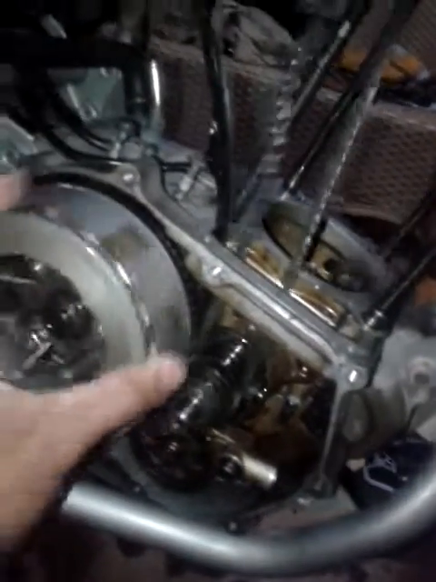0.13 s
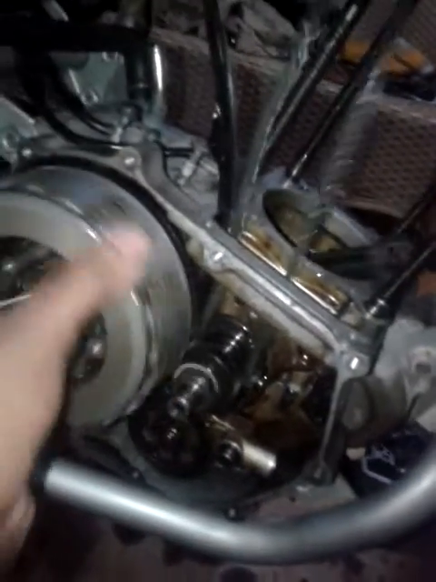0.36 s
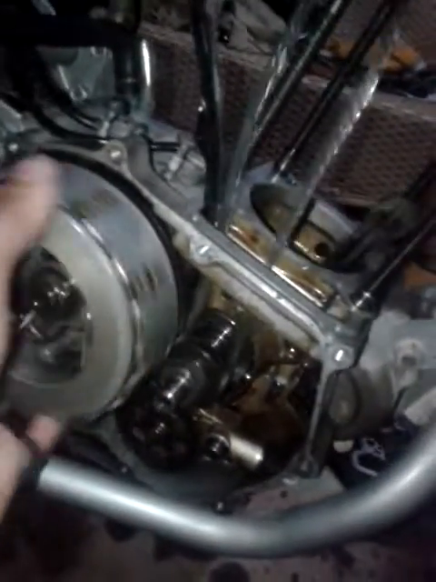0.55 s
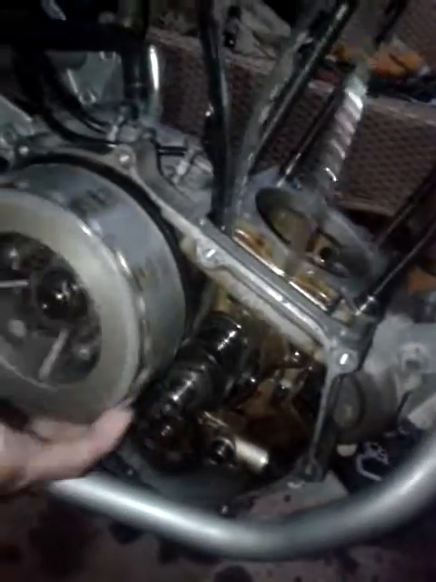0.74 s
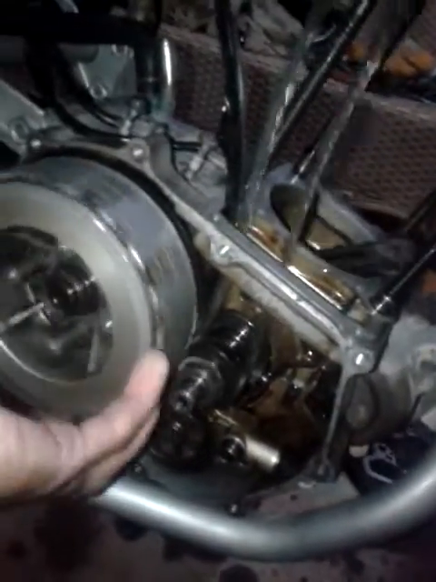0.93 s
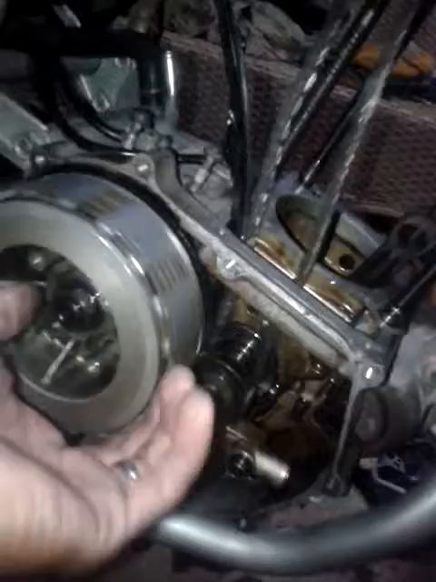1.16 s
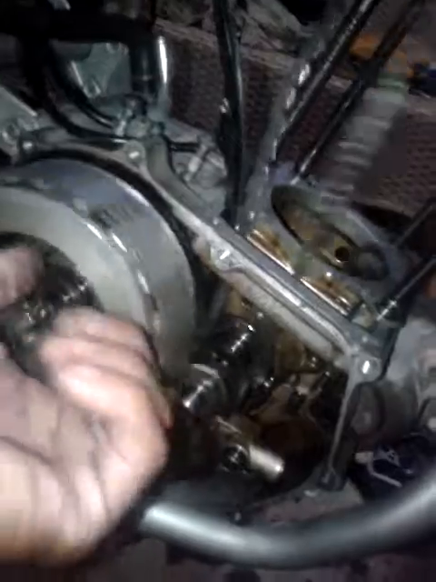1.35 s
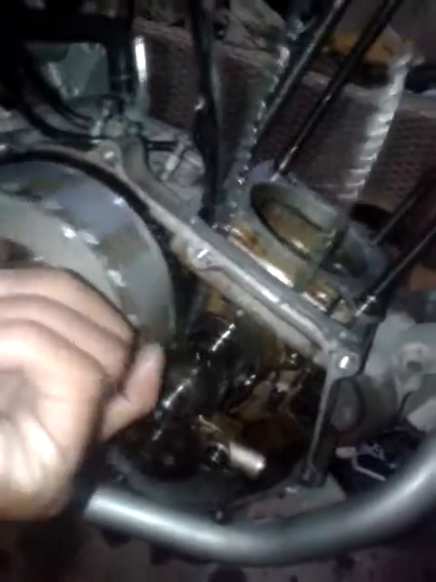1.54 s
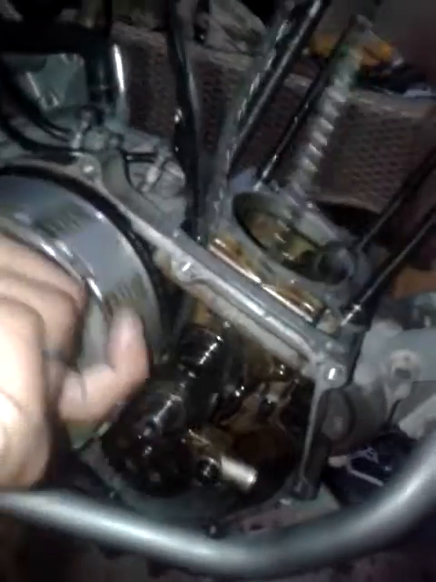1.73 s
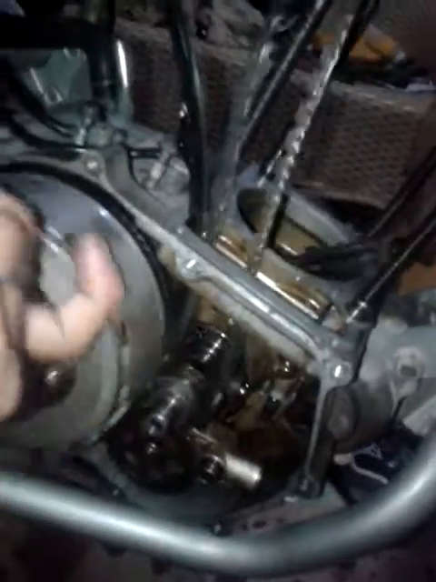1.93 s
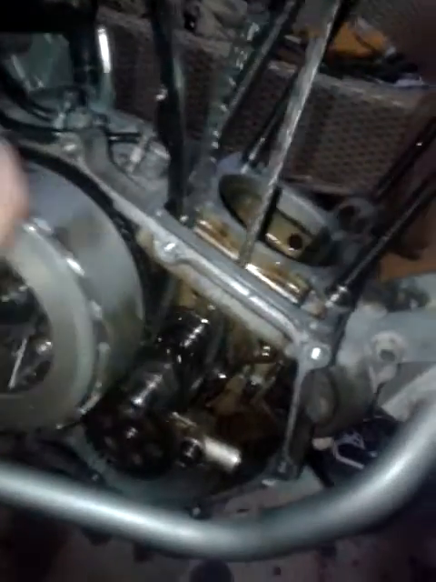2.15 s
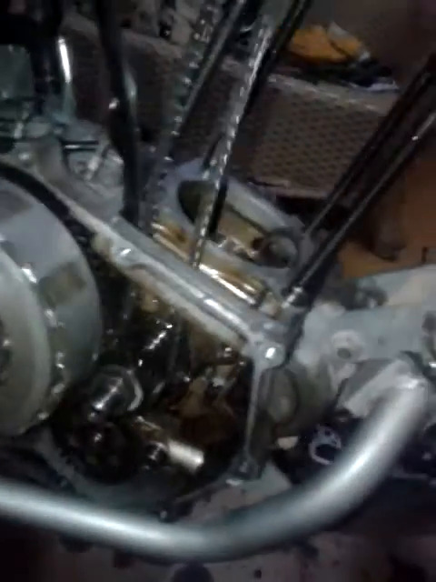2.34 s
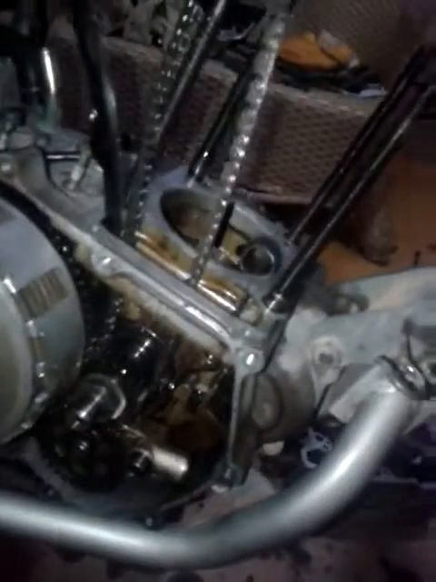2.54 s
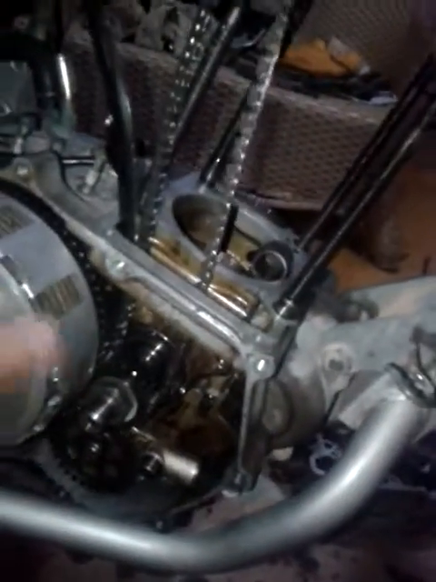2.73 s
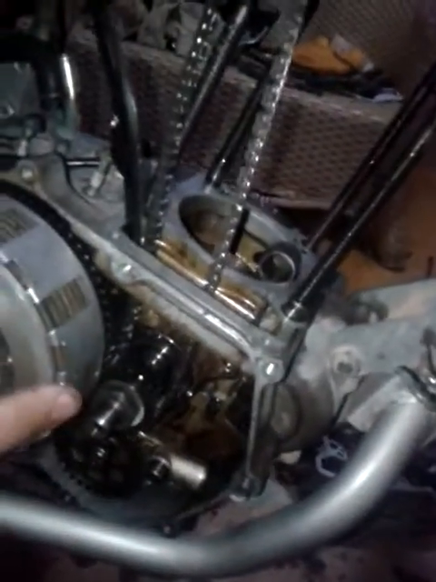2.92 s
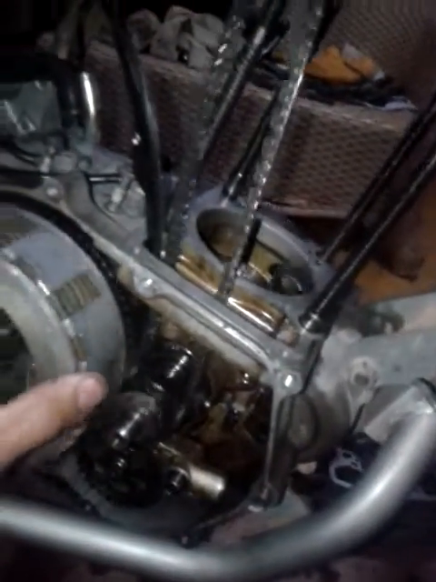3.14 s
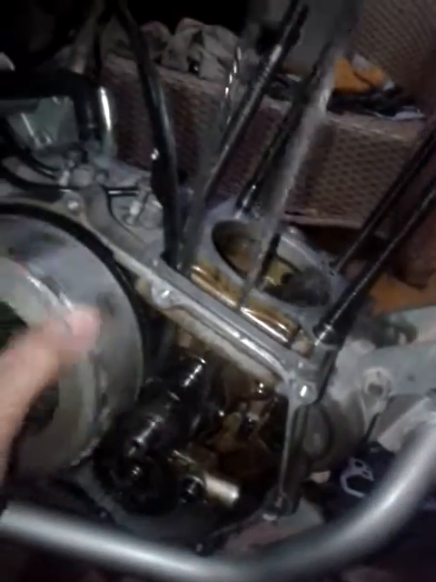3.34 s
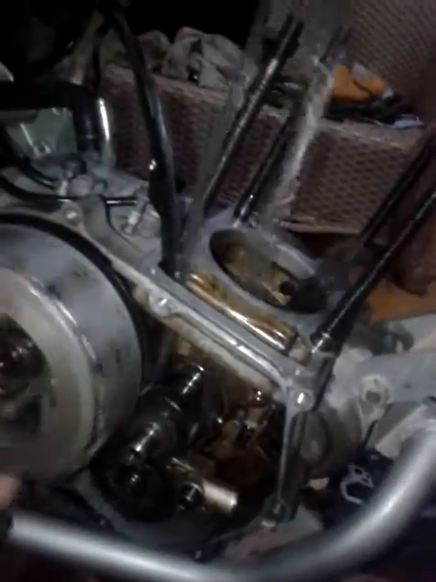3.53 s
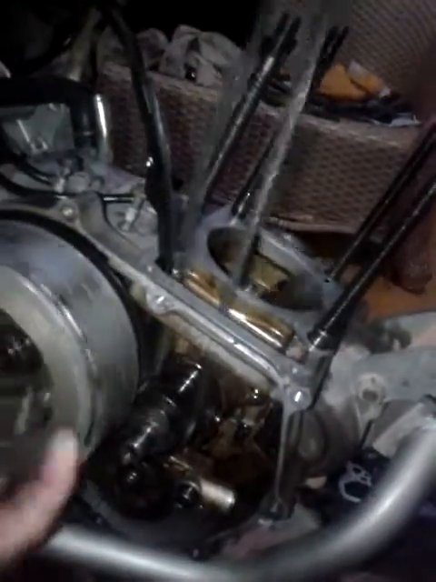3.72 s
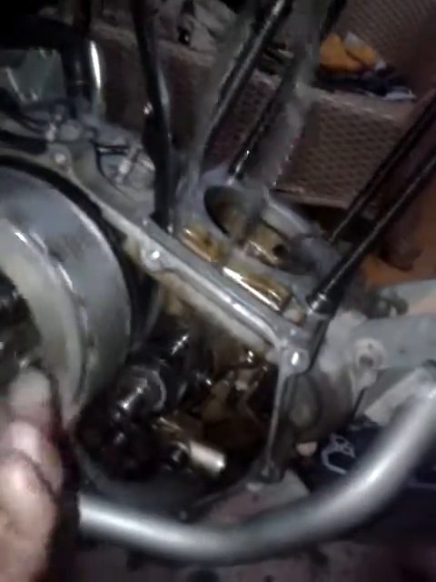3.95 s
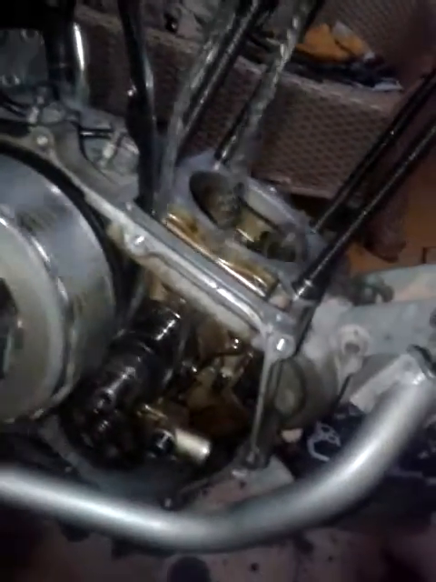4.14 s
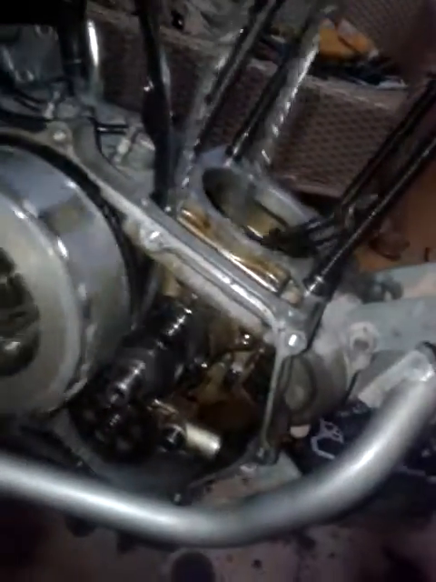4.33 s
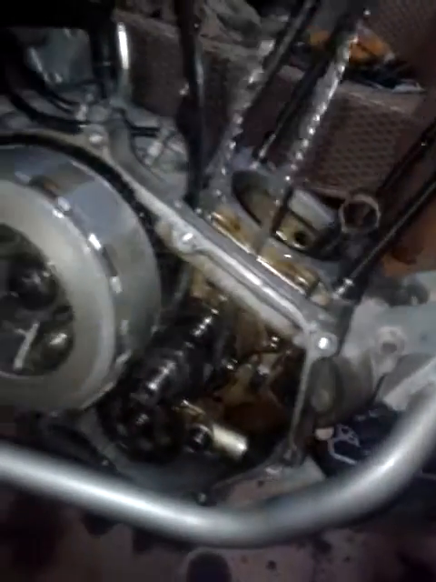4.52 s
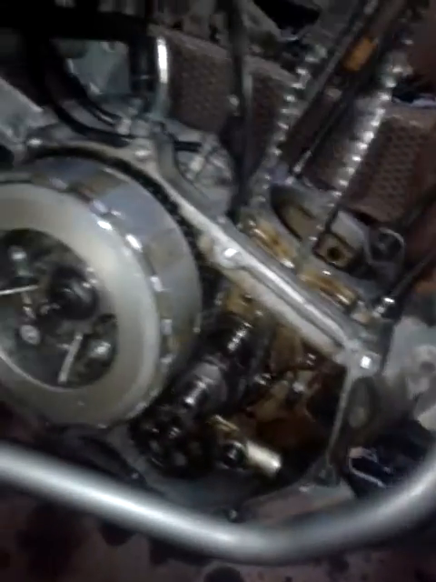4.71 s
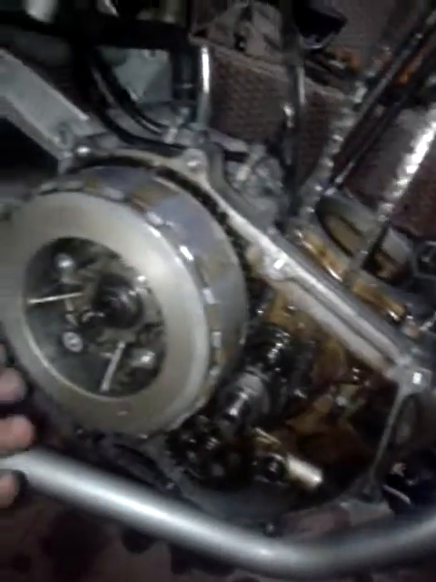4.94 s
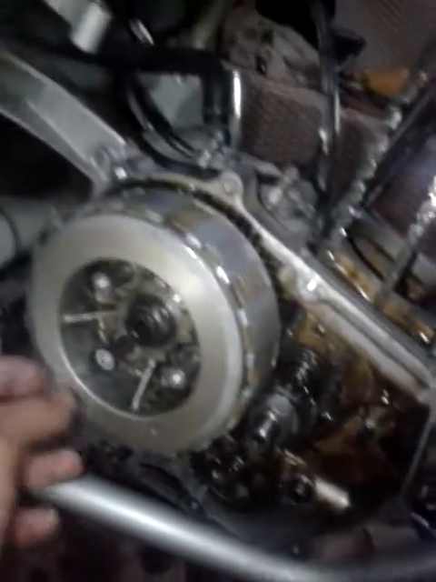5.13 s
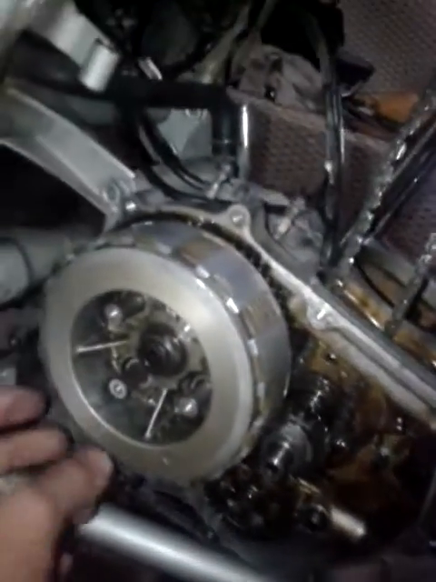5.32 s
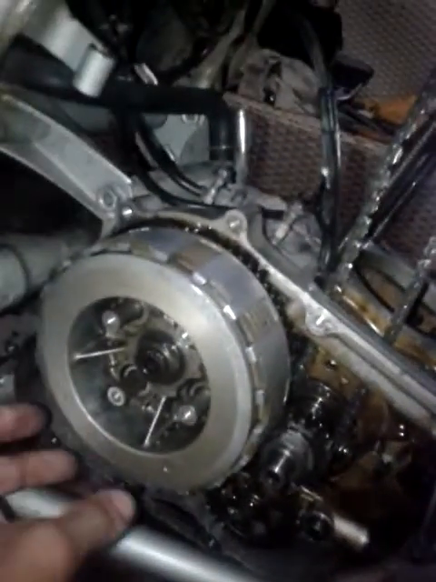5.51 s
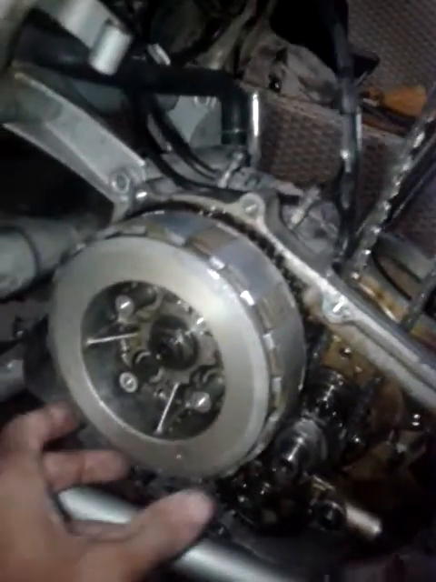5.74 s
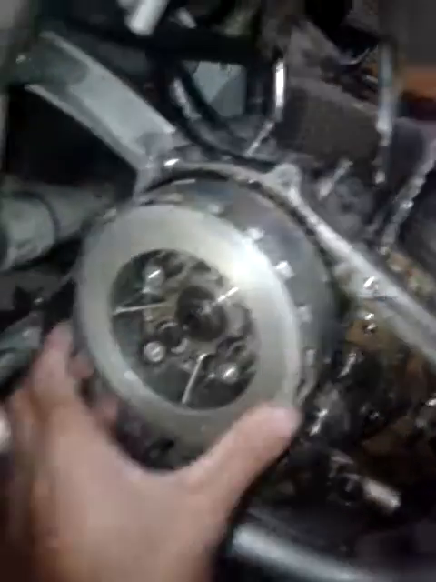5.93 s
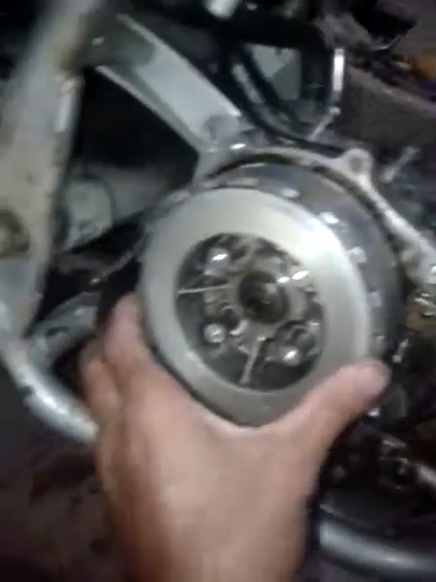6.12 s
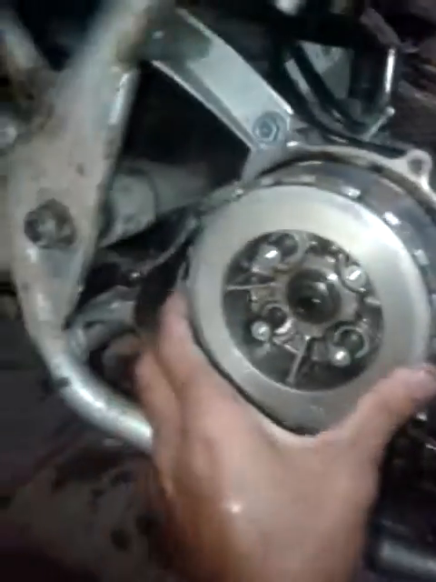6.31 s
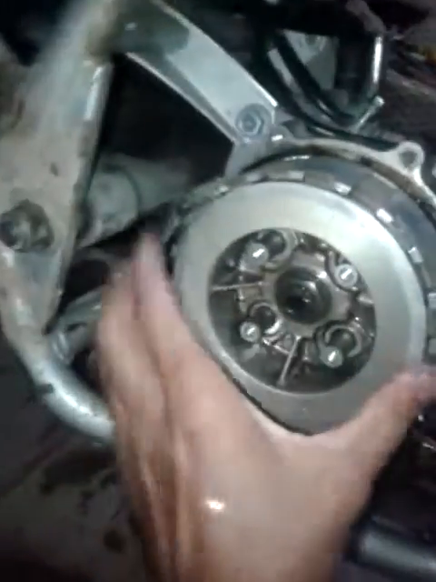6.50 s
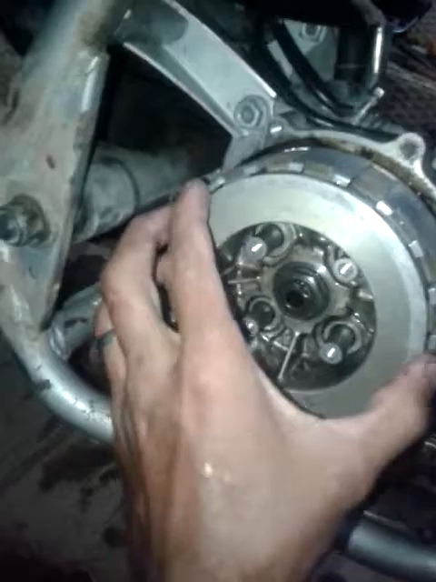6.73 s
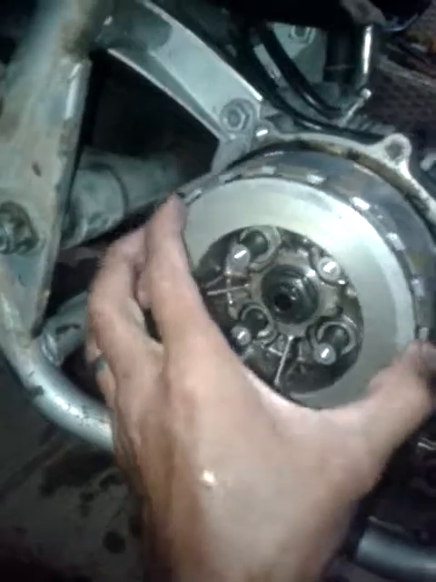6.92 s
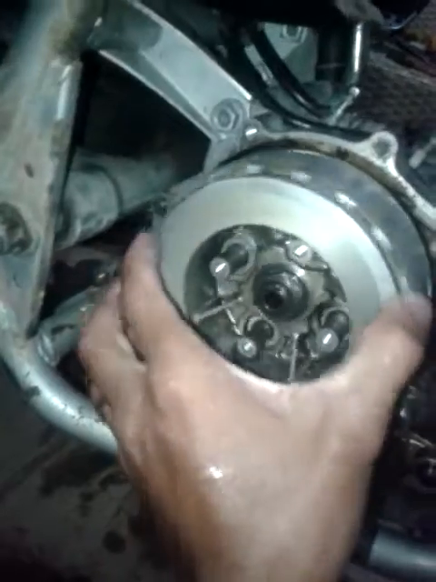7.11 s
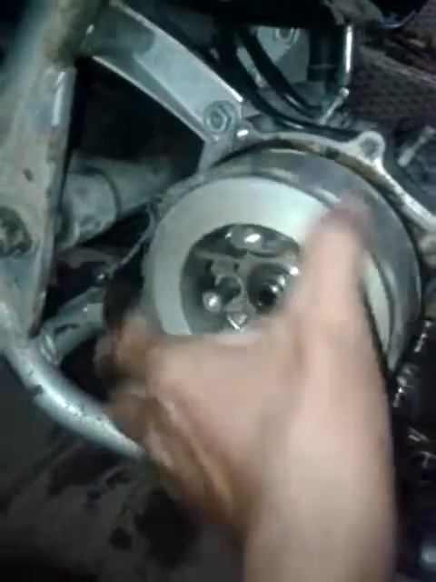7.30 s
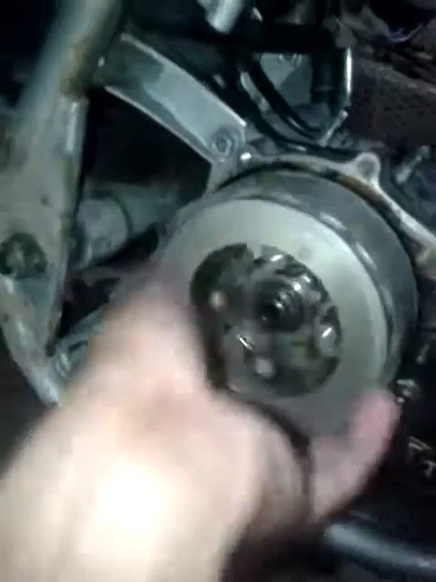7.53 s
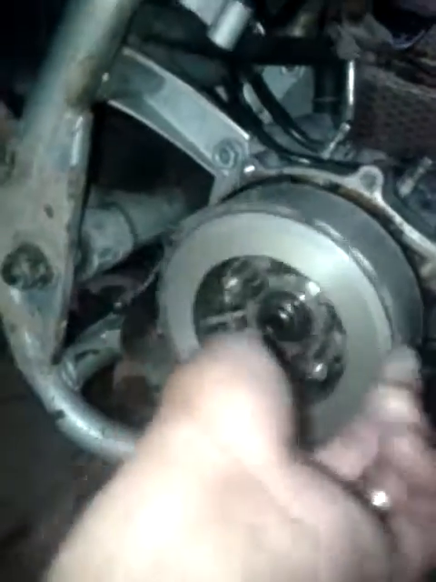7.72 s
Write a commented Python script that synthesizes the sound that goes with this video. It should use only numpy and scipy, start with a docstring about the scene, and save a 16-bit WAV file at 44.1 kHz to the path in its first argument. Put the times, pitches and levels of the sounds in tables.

```python
"""The clutch of an opened motorcycle engine is spun by hand three times, close by in a small workshop.
Gear teeth chatter into the crankcase, the slack timing chain jingles and the clutch drum sings: contact
noise through filters and damped modes. Timed knocks, steel clinks and drum pings come on top.
Between the spins only small ticks and faint finger squeaks sound over the quiet room."""
import sys
import numpy as np
from scipy import signal
from scipy.fft import rfft, irfft, next_fast_len
from scipy.io import wavfile
from scipy.ndimage import uniform_filter1d

SR = 44100
rng = np.random.default_rng(int(sys.argv[2]) if len(sys.argv) > 2 else 0)


def bounce(signal):
    """Save signal as a 16-bit WAV file at the path given by the first command-line argument."""
    frames = np.transpose(np.atleast_2d(signal))
    limited = np.clip(frames, -1, 1)
    pcm = np.round(limited * 32767).astype(np.int16)
    wavfile.write(sys.argv[1], SR, pcm)


N = 346610
T = np.arange(N) / SR


def undb(db):
    """Decibels to gain."""
    return 10 ** (np.asarray(db) / 20)


def unit(x):
    """Scale to rms 1."""
    return x / np.sqrt(np.mean(x ** 2))


def add(track, start_s, sound):
    """Mix a sound into the track at start_s."""
    start = max(int(start_s * SR), 0)
    track[start:start + len(sound)] += sound[:N - start]


def colour(x, points, size=4096):
    """Minimum-phase filter through (freq_hz, level_db) points; keeps the power of white noise."""
    freq_hz, level_db = np.transpose(points)
    grid_hz = np.maximum(np.fft.rfftfreq(size, 1 / SR), 1)
    grid_db = np.interp(np.log(grid_hz), np.log(freq_hz), level_db)
    # folding the cepstrum makes the response causal
    cepstrum = irfft(np.log(undb(grid_db)))
    cepstrum[1:size // 2] *= 2
    cepstrum[size // 2 + 1:] = 0
    response = irfft(np.exp(rfft(cepstrum)))
    return signal.fftconvolve(x, response / np.linalg.norm(response))[:N]


def ring(x, modes):
    """Drive damped modes (freq_hz, width_hz, level_db); keeps the power of white noise."""
    t = T[:SR // 4]
    response = np.zeros(len(t))
    for freq_hz, width_hz, level_db in modes:
        decay = np.exp(-np.pi * width_hz * t)
        response += undb(level_db) * width_hz * decay * np.sin(2 * np.pi * freq_hz * t)
    return signal.fftconvolve(x, response / np.linalg.norm(response))[:N]


def contacts(per_s, scatter_db, scrape_s):
    """Random contacts of uneven force, each a very short noise scrape; rms 1."""
    sizes = undb(scatter_db * np.clip(rng.standard_normal(N), -2, 2))
    hits = sizes * (rng.random(N) < per_s / SR)
    power = signal.lfilter([1], [1, -np.exp(-2 / (scrape_s * SR))], hits ** 2)
    return unit(np.sqrt(power) * rng.standard_normal(N))


def sing(modes, steadiness=0.21):
    """Modes fed by dense rubbing contacts, with their level swings partly evened out; rms 1."""
    rubbing = contacts(per_s=430, scatter_db=7, scrape_s=0.0035)
    tone = signal.hilbert(ring(rubbing, modes), next_fast_len(N))[:N]
    level = uniform_filter1d(np.abs(tone), SR // 200) + 1e-6
    return unit(tone.real / level ** steadiness)


def drift(size_samples):
    """Slow random wander, noise averaged twice over size_samples; rms 1."""
    once = uniform_filter1d(rng.standard_normal(N), size=size_samples)
    return unit(uniform_filter1d(once, size=size_samples))


def tone_swell(t, rise_s, decay_s):
    """Envelope of a short tone: soft rise, exponential decay, peak 1."""
    swell = (1 - np.exp(-(t / rise_s) ** 2)) * np.exp(-t / decay_s)
    return swell / swell.max()


def swells(rows, attack_s, release_s):
    """Gain of events (start_s, hold_s, level_db); release begins hold_s after the start."""
    gain = np.zeros(N)
    t = T[:SR]
    for start_s, hold_s, level_db in rows:
        rise = np.minimum(t / attack_s, 1)
        add(gain, start_s, undb(level_db) * rise * np.exp(-np.maximum(t - hold_s, 0) / release_s))
    return gain


# Turning pace in the three spins, one list each: time_s, level_db [re full pace at BRISK_DB]
SPIN_PACE = [
    [(0.0, -49.5), (0.16, -46.5), (0.28, -38.5), (0.59, -37.5), (0.89, -33), (1.43, -43), (1.95, -43.5),
     (2.34, -43), (2.7, -67)],
    [(3.19, -62), (3.266, -48.5), (3.394, -41), (3.504, -34.5), (3.604, -32), (3.87, -28), (4.284, -37.5),
     (4.394, -33), (4.9, -67)],
    [(6.98, -63.5), (7.054, -55), (7.188, -46), (7.354, -36), (7.496, -35.5), (7.596, -33.5), (7.85, -29)],
]
BRISK_DB = -35


def pace():
    """Briskness of the turning: 1 at BRISK_DB, 0 outside the spins."""
    brisk = np.zeros(N)
    for rows in SPIN_PACE:
        turning = (T >= rows[0][0]) * (T < rows[-1][0] + .02)
        brisk += turning * undb(np.interp(T, *np.transpose(rows)) - BRISK_DB)
    return brisk


# Gears under load: start_s, hold_s, level_db [drive]
GEAR_SURGES = [(0.1, 0.081, -42.5), (0.232, 0.019, -35.5), (0.38, 0.048, -34.5), (0.49, 0.11, -34.5),
               (0.69, 0.035, -38), (0.915, 0.04, -34.5), (1.57, 0.015, -51), (1.76, 0.08, -39.5),
               (1.96, 0.1, -39.5), (2.322, 0.048, -42), (2.385, 0.016, -43.5), (2.505, 0.032, -46.5),
               (3.21, 0.26, -51.5), (3.42, .03, -36), (3.503, 0.047, -29.5), (3.678, 0.037, -29),
               (3.887, .045, -28), (4.238, 0.03, -31.5), (4.33, 0.037, -41), (7.09, 0.066, -51.5),
               (7.35, 0.025, -37.5), (7.435, 0.022, -33), (7.82, .04, -36)]
CHATTER_DB, CHATTER_GROWTH = -38.5, 0.88  # drive at pace 1; power of the pace


def gear_drive(brisk):
    """Chatter grows with the pace; surges under load add in power."""
    steady = undb(CHATTER_DB) * brisk ** CHATTER_GROWTH
    return np.hypot(steady, swells(GEAR_SURGES, attack_s=0.01, release_s=0.032))


# Tooth chatter spectrum: freq_hz, level_db [relative]
GEAR_COLOUR = [(250, -28.5), (550, -21), (950, 4.5), (1170, -0.5), (1400, 4), (1900, 4), (2400, -3.5),
               (2900, -9), (3700, -2), (5200, -13), (6000, -16), (9000, -26.5), (10000, -44),
               (15000, -46.5)]
# Crankcase resonances: freq_hz, width_hz, level_db [relative]
CRANKCASE_MODES = [(254, 11, -2), (310, 13, -7.5), (382.3, 30, 2.5), (395.8, 14, 0), (495, 10, -2),
                   (695, 16, 2.5), (946, 13, -4), (1071, 23, 2), (1239, 9.8, 3.5), (1368, 42, 4.5),
                   (1458, 43, 3), (2084, 15.6, 1), (2323, 92, -0.5), (2510, 30, -8)]
# Low rolling spectrum: freq_hz, level_db [relative]
ROLLING_COLOUR = [(110, -34.5), (175, -6), (240, -6.5), (400, 5), (600, 0), (800, 1), (1400, -39)]


def gears(chatter, rumble_growth=0.88, lurch_db=0.14):
    """Teeth tap each other and ring the case; rolling and case grow more slowly than the taps."""
    force = chatter * undb(lurch_db * drift(400))  # slight flutter in the backlash
    rumble = force ** rumble_growth
    teeth = colour(force * contacts(per_s=420, scatter_db=5, scrape_s=0.0028), GEAR_COLOUR)
    walls = ring(rumble * contacts(per_s=350, scatter_db=5, scrape_s=0.0053), CRANKCASE_MODES)
    rolling = colour(rumble * contacts(per_s=1400, scatter_db=2, scrape_s=0.0018), ROLLING_COLOUR)
    return undb(-0.5) * teeth + undb(-8) * walls + undb(-14.5) * rolling


# Slack chain swinging: start_s, hold_s, level_db [drive]
CHAIN_SWINGS = [(0.2, 0.14, -35.5), (0.385, 0.12, -39.5), (0.6, 0.087, -41.5), (0.8, .13, -34.5),
                (0.98, 0.055, -37), (1.13, .11, -44.5), (1.36, 0.17, -44.5), (1.99, 0.11, -43),
                (2.17, 0.012, -32), (2.39, 0.12, -42), (3.69, 0.14, -30), (4.485, 0.083, -33.5),
                (7.13, 0.25, -48), (7.53, 0.22, -41)]
JINGLE_DB, JINGLE_GROWTH = -38.5, 0.87  # drive at shaking 1; power of the shaking
CHAIN_START_PACE = 0.083  # at or below this only the swings drive the chain


def chain_drive(brisk):
    """Jingle grows with the pace above a threshold; swings of the slack chain add in power."""
    shaking = np.maximum(brisk - CHAIN_START_PACE, 0)
    steady = undb(JINGLE_DB) * shaking ** JINGLE_GROWTH
    return np.hypot(steady, swells(CHAIN_SWINGS, attack_s=.012, release_s=.022))


# Link click spectrum: freq_hz, level_db [relative]
LINK_COLOUR = [(1500, -32.5), (3000, -2), (3800, -2), (4700, 10.5), (5300, 7.5), (5800, -15), (8300, -12),
               (9100, -12.5), (9900, -41.5), (15000, -34.5)]
# Chain and loose steel resonances: freq_hz, width_hz, level_db [relative]
LOOSE_STEEL_MODES = [(4630, 39, -7.5), (4730, 30, -1.5), (4695, 59, 6), (5120, 42, -8), (6980, 90, -17.5),
                     (8876, 56, -11), (13720, 1000, -47.5)]


def chain(chatter, jingle):
    """Links click over the sprocket, harder as the gears work, and keep the steel ringing."""
    clicks = contacts(per_s=360, scatter_db=1.5, scrape_s=0.0029)
    links = colour(np.sqrt(chatter * jingle) * clicks, LINK_COLOUR)
    steel = jingle * sing(LOOSE_STEEL_MODES, steadiness=0.093)
    return undb(-3.5) * links + undb(-2.5) * steel


# Clutch drum resonances: freq_hz, width_hz, level_db [relative]
CLUTCH_MODES = [(1692, 13, -4), (1749, 27, -1.5)]
SINGING_DB, SINGING_GROWTH = -40.5, 1.0  # at pace 1, before the sway; power of the pace


def drum(brisk, sway_db=3.0):
    """Meshing teeth keep the drum singing on a close pair of modes, with a swaying level."""
    sway = undb(sway_db * np.clip(drift(1500), -2, 2))
    return undb(SINGING_DB) * brisk ** SINGING_GROWTH * sway * sing(CLUTCH_MODES)


# Single drum pings: start_s, level_db [before ping_db], pitch_hz
DRUM_PINGS = [(0.5758, -27, 1680), (0.665, -28, 1640), (0.6873, -22.5, 1692), (0.7849, -27, 1710),
              (1.3237, -26.5, 1778), (1.7594, -26.5, 1733), (2.1368, -32.5, 1630), (3.511, -23.5, 1700),
              (3.7237, -22, 1730), (3.7469, -17, 1707), (3.9608, -20, 1728), (4.0926, -19.5, 1714),
              (4.1169, -22, 1773), (4.2484, -26, 1740), (7.436, -24, 1836), (7.6556, -21, 1680),
              (7.7178, -24, 1682), (7.787, -33, 1696)]


def pings(rise_s=0.0044, decay_s=.014, ping_db=-3):
    """A tooth that lands squarely draws one short tone from the drum."""
    tones = np.zeros(N)
    t = T[:SR // 4]
    swell = tone_swell(t, rise_s, decay_s)
    for start_s, level_db, pitch_hz in DRUM_PINGS:
        add(tones, start_s, undb(level_db) * swell * np.sin(2 * np.pi * pitch_hz * t))
    return undb(ping_db) * tones


# Backlash knocks: start_s, thud_db, edge_db [before the mix gains]
BACKLASH_KNOCKS = [(0.1093, -28, -44), (0.18, -19.5, -33.5), (0.24, -22.5, -36.5), (1.652, -23.5, -37),
                   (1.6697, -44, -52), (1.819, -32, -58), (2.8524, -43, -61), (3.332, -28, -40.5),
                   (3.458, -18.5, -50), (3.5056, -17.5, -29), (3.6856, -16.5, -27), (3.8877, -4, -13.5),
                   (3.907, -16, -22), (4.241, -17, -42), (4.759, -40, -66), (4.836, -63, -59.5),
                   (5.302, -48, -72.5), (5.625, -51.5, -59.5), (5.9673, -47.5, -58.5), (6.0862, -40.5, -56),
                   (6.559, -50, -56.5), (6.7762, -51, -75.5), (6.9973, -39, -68), (7.031, -41.5, -73),
                   (7.4368, -18, -23), (7.659, -19.5, -23)]
# Dull body of a blow: freq_hz, level_db [relative]
THUD_COLOUR = [(100, -38), (250, -15), (600, -15.5), (1000, -4.5), (1400, 4), (2100, 2.5), (2900, -10),
               (4000, -24), (7000, -39)]
# Hard edge of a blow: freq_hz, level_db [relative]
EDGE_COLOUR = [(1500, -27), (3000, -2.5), (3900, 5.5), (5200, 5), (6200, -17.5), (9000, -22), (10500, -46),
               (15000, -48.5)]


def knocks(blow_s=0.0051, rattle_s=0.049, rattle_db=-12):
    """A tooth flank slams home, then the gear train rattles out: noise with a two-stage decay."""
    thuds, edges = np.zeros((2, N))
    t = T[:SR // 3]
    force = np.hypot(np.exp(-t / blow_s), undb(rattle_db) * np.exp(-t / rattle_s))
    for start_s, thud_db, edge_db in BACKLASH_KNOCKS:
        add(thuds, start_s, undb(thud_db) * force)
        add(edges, start_s, undb(edge_db) * force)
    thud = colour(thuds * rng.standard_normal(N), THUD_COLOUR)
    edge = colour(edges * rng.standard_normal(N), EDGE_COLOUR)
    return undb(-6.5) * thud + undb(4.0) * edge


# Loose steel strikes: start_s, ring_db, pitch_hz, snap_db [levels before the mix gains]
STEEL_CLINKS = [(0.2019, -24, 4665, -40), (0.2711, -20, 4620, -61), (0.5745, -14, 4810, -31.5),
                (0.6585, -29, 4760, -44), (0.8026, -23, 4790, -37), (0.9679, -18, 4760, -52),
                (1.1453, -23, 4780, -43.5), (1.321, -32.5, 4800, -39.5), (1.3756, -33, 4760, -46),
                (1.4316, -31.5, 4830, -46), (1.491, -28.5, 4810, -39), (1.6918, -18, 4590, -52),
                (1.73, -19.5, 4730, -37), (1.7648, -25.5, 4700, -42), (1.953, -28, 4570, -46.5),
                (1.9982, -21, 4730, -42), (2.0581, -23.5, 4720, -45), (2.4185, -35, 4570, -45),
                (2.85, -45, 4540, -66), (3.243, -37.5, 4640, -55.5), (3.3885, -23, 4730, -43.5),
                (3.6365, -14, 4690, -41), (3.687, -11.5, 4660, -29.5), (3.8285, -17.5, 4590, -37),
                (4.0365, -25.5, 4580, -34), (4.237, -11.5, 4090, -58.5), (4.4887, -18, 4780, -34),
                (4.6443, -24.5, 4624, -48), (4.8642, -48, 4600, -68), (6.558, -48.5, 1890, -73),
                (7.12, -38.5, 4500, -64), (7.2415, -25.5, 4710, -70), (7.2638, -25, 4680, -60),
                (7.439, -9, 4700, -53), (7.509, -5.5, 4636, -28.5), (7.543, -25, 4700, -39),
                (7.6295, -11.5, 4640, -39)]
# Bright snap spectrum: freq_hz, level_db [relative]
SNAP_COLOUR = [(1500, -13), (4000, 10), (7000, 1), (8300, 1), (9000, 5.5), (10000, -22.5), (13000, -17),
               (14600, -20.5)]


def clinks(rise_s=0.00092, decay_s=0.006, snap_s=0.015, bounce_s=0.03):
    """Each strike swells into one short steel tone, with a bright snap and a shiver of small bounces."""
    tones, snaps, bounces = np.zeros((3, N))
    t = T[:SR // 4]
    swell = tone_swell(t, rise_s, decay_s)
    for start_s, ring_db, pitch_hz, snap_db in STEEL_CLINKS:
        add(tones, start_s, undb(ring_db) * swell * np.sin(2 * np.pi * pitch_hz * t))
        add(snaps, start_s, undb(snap_db) * np.exp(-t / snap_s))
        add(bounces, start_s, undb(ring_db) * np.exp(-t / bounce_s))
    snap = colour(snaps * rng.standard_normal(N), SNAP_COLOUR)
    shiver = bounces * contacts(per_s=1600, scatter_db=5, scrape_s=0.0013)
    bright = ring(shiver, LOOSE_STEEL_MODES)
    dull = colour(shiver, THUD_COLOUR)
    return undb(0.5) * tones + undb(2.0) * snap + undb(-17.5) * bright + undb(-30.5) * dull


# Finger slips on the resting drum: start_s, hold_s, level_db [before the mix gain]
FINGER_SLIPS = [(2.82, 0.061, -55), (5.89, 0.061, -61.5), (6.54, 0.086, -65.5)]


def fingers(squeak_hz=4200, width_hz=380):
    """Oily fingertips slip on the rim: fine contacts through one broad mode, a thin squeak."""
    slips = ring(contacts(per_s=450, scatter_db=1.5, scrape_s=0.0024), [(squeak_hz, width_hz, 0)])
    return undb(-3.0) * swells(FINGER_SLIPS, attack_s=.03, release_s=.07) * slips


def reverberate(x, t60_s, wet_db, gap_s):
    """Nearby surfaces return a dense noise tail that builds over gap_s and decays by t60_s."""
    t = T[:SR]
    decay = np.exp(-np.log(1000) * t / t60_s)
    tail = rng.standard_normal(SR) * decay * (1 - np.exp(-(t / gap_s) ** 2))
    return x + undb(wet_db) * signal.fftconvolve(x, tail / np.linalg.norm(tail))[:N]


# Room air spectrum: freq_hz, level_db [relative]
ROOM_COLOUR = [(30, -15), (60, -11.5), (90, -2.5), (140, -1), (200, 1.5), (300, -4.5), (450, -7),
               (750, -13), (1450, -14), (3100, -19.5), (4200, -19.5), (5200, -15), (6000, -25.5),
               (15000, -25.5)]
WORKSHOP_DB = -60.5  # rms


def workshop():
    """Steady low murmur of the room air with a faint hiss: filtered noise."""
    return undb(WORKSHOP_DB) * unit(colour(rng.standard_normal(N), ROOM_COLOUR))


def scene():
    """The pace drives gears, chain and drum; timed strikes and slips join, then the room."""
    brisk = pace()
    chatter = gear_drive(brisk)
    turning = gears(chatter) + chain(chatter, chain_drive(brisk)) + drum(brisk)
    engine = turning + pings() + knocks() + clinks() + fingers()
    # parts this small radiate almost no deep bass
    engine = signal.sosfilt(signal.butter(6, 190, "high", fs=SR, output="sos"), engine)
    room = reverberate(engine, t60_s=0.58, wet_db=-8.0, gap_s=0.0021)
    return (room + workshop())[None]


TOP_HZ = 15200


def record(dry, drive=0.31):
    """A phone softly rounds the loudest peaks and cuts the treble above TOP_HZ."""
    rounded = np.tanh(drive * dry) / drive
    return signal.sosfilt(signal.ellip(10, .2, 70, TOP_HZ, fs=SR, output="sos"), rounded)


dry = scene()
out = record(dry)
bounce(out)
```